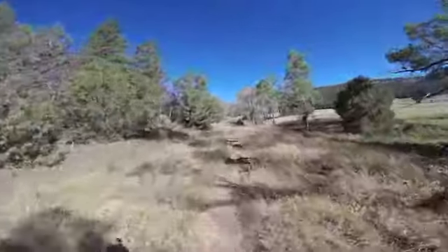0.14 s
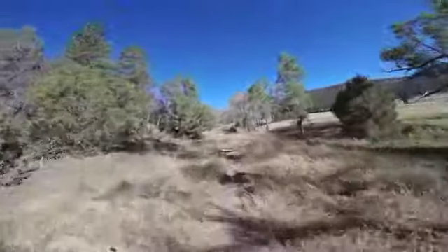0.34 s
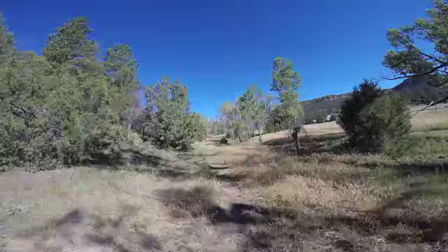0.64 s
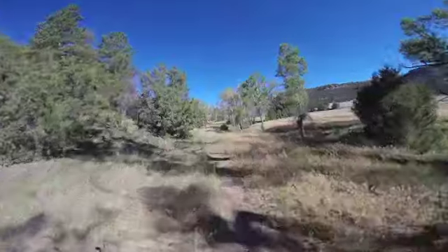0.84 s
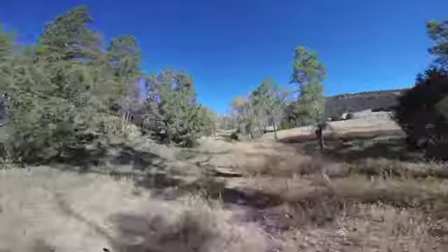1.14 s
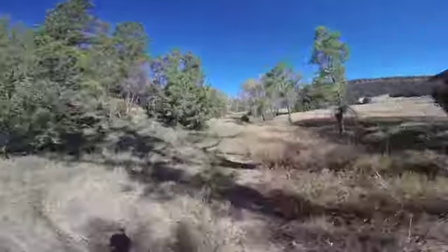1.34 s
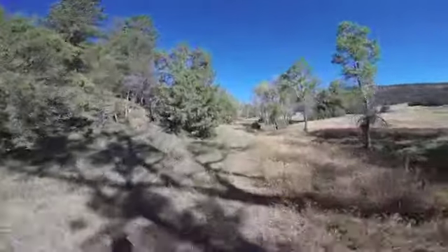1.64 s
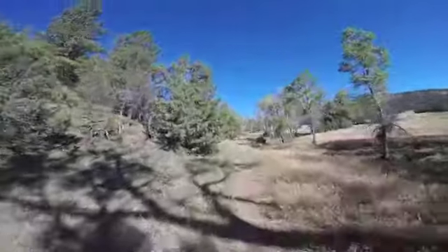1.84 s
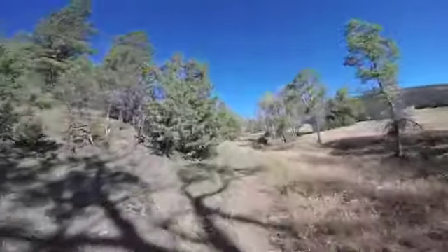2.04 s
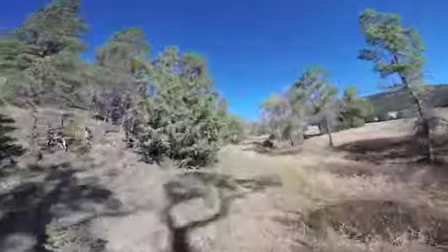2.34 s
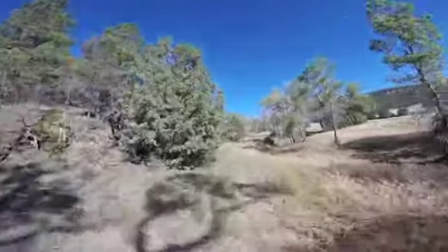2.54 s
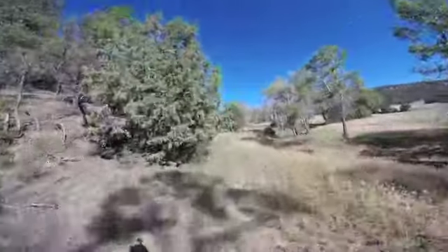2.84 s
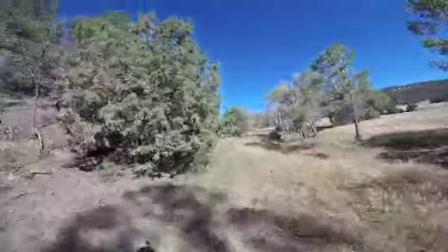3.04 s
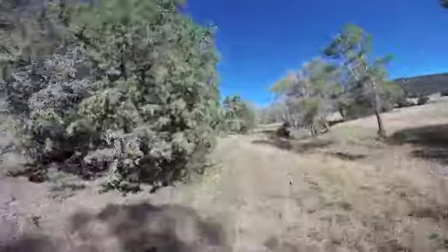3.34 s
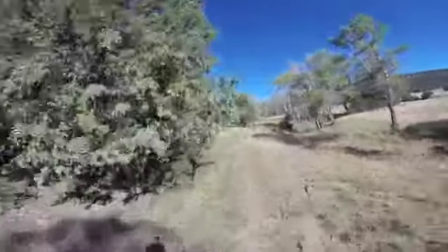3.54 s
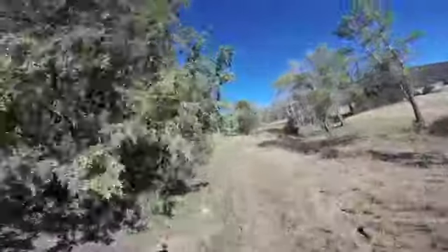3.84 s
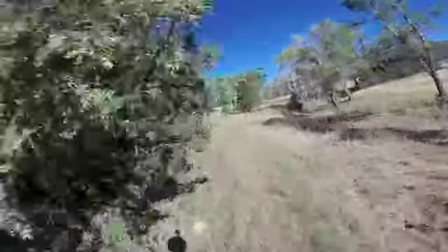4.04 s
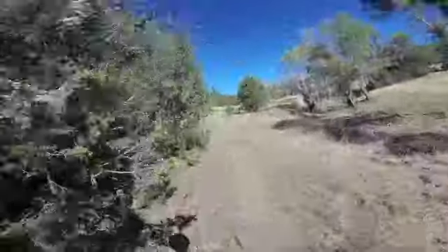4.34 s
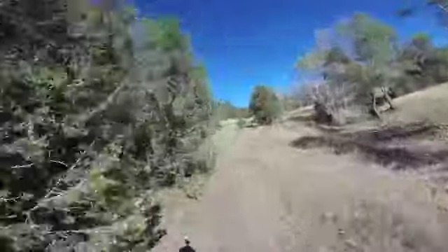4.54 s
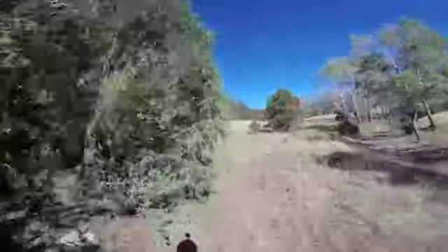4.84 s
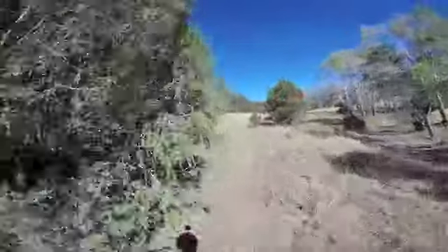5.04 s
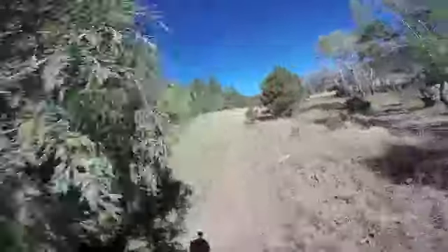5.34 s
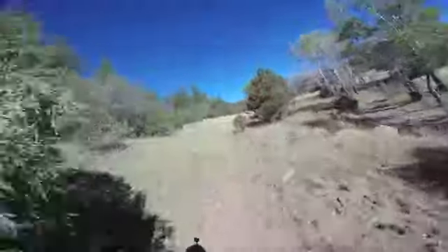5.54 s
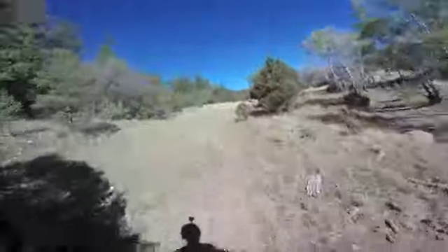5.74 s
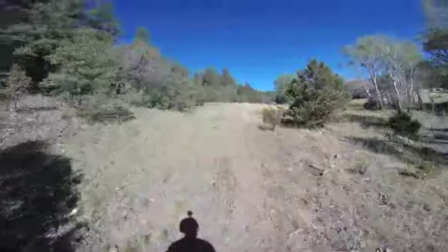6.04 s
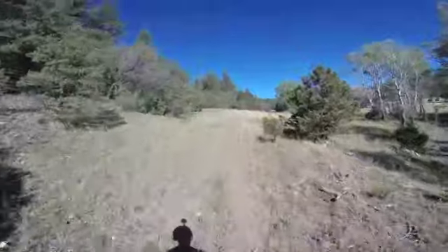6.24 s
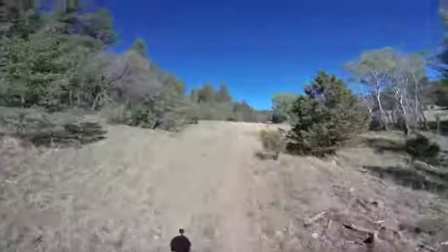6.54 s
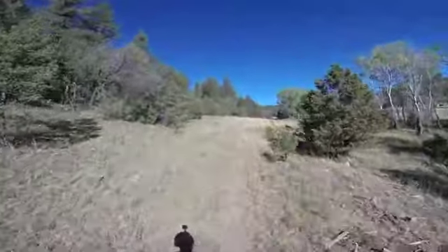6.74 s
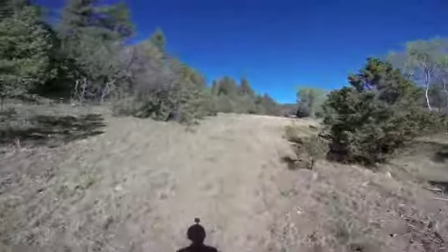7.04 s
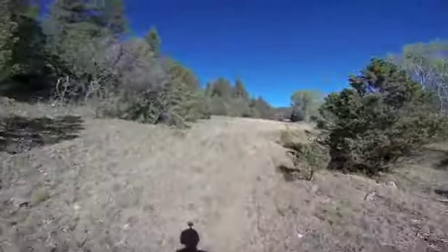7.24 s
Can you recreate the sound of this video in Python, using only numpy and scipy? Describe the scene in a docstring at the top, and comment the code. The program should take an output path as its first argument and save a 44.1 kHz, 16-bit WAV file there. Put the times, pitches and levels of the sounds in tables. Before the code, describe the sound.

Mountain bike on a dirt trail heard from inside a camera case: low rumble, hollow knocks, brake disc tings, and a branch lashing sharply midway.

```python
"""A dirt trail under a mountain bike, heard from inside the hard case of a helmet camera.
Noise and sparse grains make the tyres' grit and drone, over a low shudder near 25 Hz at a wandering rate.
Struck banks of dying modes make the knocks, bumps, brake disc tings and clacks; slips make the disc shimmer.
Noise snaps and ringing make sharp blows on the case: a dull clack, then a branch's lashes.
Faint hiss and whine come from the electronics; the camera's limiter ducks everything under the loudest peaks."""
import sys
import numpy as np
from scipy import signal
from scipy.fft import rfft, irfft
from scipy.io import wavfile
from scipy.ndimage import uniform_filter1d, minimum_filter1d

SR = 44100
rng = np.random.default_rng(int(sys.argv[2]) if len(sys.argv) > 2 else 0)


def generate_wav(signal):
    """Clip the signal to [-1, 1] and save it as 16-bit WAV at the path in sys.argv[1]."""
    frames = np.transpose(np.atleast_2d(signal))
    scaled = np.clip(frames, -1, 1) * 32767
    pcm = np.round(scaled).astype(np.int16)
    wavfile.write(sys.argv[1], SR, pcm)


N = 325453
TIME = np.arange(N) / SR  # seconds
AGE = np.arange(SR // 3) / SR  # seconds since a blow

# The ground under the tyres, as a curve.
# Each row: time in seconds, level of grit in dB, level of rolling drone in dB before its trim.
GROUND = [(0, -60, -52.5), (.75, -60.5, -44.5), (1.35, -60, -51), (2.05, -61.5, -48), (2.55, -60.5, -47.5),
          (3.0, -62, -49), (3.35, -58, -36), (3.75, -58, -42), (4.301, -55, -37), (4.699, -59.5, -45),
          (5.201, -61.5, -43), (5.6, -58.5, -49), (5.95, -52.5, -40.5), (6.3, -57.5, -49),
          (6.748, -61, -57.5), (7.38, -61, -55)]
# How the camera shudders with the roll of the trail, as a curve. Each row: time in seconds, level in dB.
SWAY = [(0, -43), (.45, -29.5), (.8, -20.5), (1.0, -34), (1.4, -35.5), (1.75, -29), (2.2, -31.5),
        (2.45, -25.5), (3.05, -35), (3.35, -29.5), (4.0, -22.5), (4.6, -31), (5.3, -34), (5.9, -26),
        (6.5, -34), (7.38, -35.5)]
# A tyre slides briefly through loose grit. Each row: middle in seconds, length in seconds, level in dB.
SLIDES = [(0.675, 0.057, -49.5), (2.015, 0.14, -54), (3.21, 0.11, -50.5), (3.335, 0.039, -47.5),
          (5.758, 0.04, -43.5), (5.884, 0.042, -44), (6.063, 0.066, -40.5)]
# How the pad rubs the disc, as a curve.
# Each row: time in seconds, level of the shimmer in dB, level of the light grazes in dB before their trims.
BRUSH = [(0, -72, -45.5), (.5, -68, -43), (1.3, -74, -43), (1.8, -70.5, -45), (2.9, -75, -45),
         (3.7, -67.5, -42.5), (4.15, -74, -48), (4.35, -61, -46.5), (4.601, -72.5, -41.5), (5.3, -79, -52),
         (5.41, -60.5, -53.5), (5.5, -70, -48.5), (5.77, -60, -46.5), (6.0, -64, -48), (6.25, -64, -49),
         (6.6, -76.5, -55.5), (7.001, -72.5, -50), (7.38, -73, -42)]

# Soft bumps under the tyres.
# Each row: start in seconds, thud level in dB, level of the grit scuff in dB, both before their trims.
BUMPS = [(0.002, -33, -31), (0.698, -28, -40), (0.772, -29, -38.5), (0.904, -33, -39.5), (1.468, -37, -39),
         (1.694, -25, -36.5), (1.763, -30, -41), (2.067, -31.5, -39), (2.281, -38, -43),
         (2.747, -20, -32.5), (3.186, -21, -34), (3.547, -28, -38), (3.886, -21, -40), (4.11, -15.5, -32),
         (4.226, -25.5, -37), (4.323, -30, -46), (4.45, -21, -31), (4.595, -34, -39.5), (5.711, -40, -40.5),
         (5.863, -22.5, -35.5), (6.013, -30.5, -45), (6.202, -31, -45)]
# The brake disc strikes its pad hard. Each row: start in seconds, level in dB before its trim.
TINGS = [(.508, -36), (.54, -38.5), (.606, -33.5), (.671, -34), (.81, -36), (.869, -41.5), (.93, -37.5),
         (1.075, -38.5), (1.175, -38.5), (1.35, -36), (1.787, -36), (1.988, -37), (2.211, -35.5),
         (2.346, -39), (2.872, -39), (3.027, -34.5), (3.168, -37.5), (3.5, -36), (3.64, -31.5),
         (3.777, -33.5), (4.237, -37), (4.265, -36.5), (4.71, -41), (5.033, -41), (5.219, -40.5),
         (5.26, -42.5), (5.395, -41.5), (5.595, -35), (5.879, -27), (6.04, -28.5), (6.165, -29.5),
         (6.282, -32), (6.343, -32.5), (6.389, -36), (6.461, -41.5)]
# The mount knocks against its stop. Each row: time of the main blow in seconds, its peak in dB.
KNOCKS = [(0.3239, -18), (0.576, -23), (0.7579, -13.5), (1.0048, -27), (1.205, -17), (1.6115, -21),
          (2.1219, -25), (2.3909, -22), (2.5914, -25), (2.8135, -15.5), (2.9953, -23.5), (3.106, -14.5),
          (3.236, -1), (3.377, -8), (3.614, -7), (3.6922, -17), (3.8315, -17), (3.935, -7.5), (4.185, -25),
          (4.5094, -9), (4.659, -15), (4.882, -18.5), (5.1013, -18.5), (5.462, -24.5), (5.7956, -1.5),
          (5.9559, -14.5), (6.116, -3.5), (6.4328, -18), (6.6307, -28), (7.1116, -33.5), (7.3523, -25.5)]
# Hard parts clack together.
# Each row: start in seconds, level in dB, hardness as a cut-off in Hz, ring length as a factor.
CLACKS = [(0.342, -37.5, 2100, 0.9), (1.1375, -47, 13000, 0.23), (1.1379, -39.5, 2300, 0.96),
          (1.8956, -54.5, 9200, 0.98), (2.681, -30, 9900, 0.96), (3.4709, -46.5, 9700, 1)]
# Sharp blows strike the case: a dull clack at 3.25, then a branch's lashes from 4.388.
# Each row: start in seconds, peak in dB, hardness as a cut-off in Hz, ring length as a factor.
SHARP_BLOWS = [(3.2535, -4, 2500, 0.28), (4.388, 18, 13000, 0.64), (4.3911, 10.5, 8940, 0.6),
               (4.4012, 7.5, 12000, 0.57), (4.403, -2, 8070, 0.92)]

# Spectra of the crushed grit, the frame's drone, the electronics' hiss, the hard chatter and the
# sharp blows' snap. Each row: frequency in Hz, relative density in dB per Hz.
GRIT_SPECTRUM = [(350, 9.5), (600, -1), (800, 1.5), (1050, -1), (1420, 1), (1900, -6.5), (2450, -0.5),
                 (3200, -15.5), (4500, -20), (8000, -31), (15000, -39.5)]
DRONE_SPECTRUM = [(45, 5.5), (70, -18), (130, -1), (186, 5.5), (225, -4), (290, -14.5), (385, -9),
                  (520, -24.5), (800, -44.5)]
HISS_SPECTRUM = [(100, 2), (1500, 0), (3500, 3), (4200, -4.5), (6000, -4.5), (8000, -13.5), (11000, -12),
                 (15000, -20)]
CHATTER_SPECTRUM = [(400, -16), (1000, 0), (1500, 5.5), (2100, -4), (2700, -2.5), (3800, -30.5),
                    (5300, -19), (6400, -21), (8200, -40), (9500, -19), (14000, -25)]
SNAP_SPECTRUM = [(300, -13), (950, -5), (1200, -13.5), (1500, 1), (1900, -1), (2300, 7), (3000, -4),
                 (4200, -6), (5000, -11), (5900, -2), (7300, -19), (10000, -16), (15000, -26)]

# Modes of the mount, the case, the lens cover, and the disc's main and upper groups.
# Each row: frequency in Hz, relative level in dB, t60 in seconds at a ring length of 1.
MOUNT_MODES = [(95, -15, .05), (119.5, -9, 0.082), (184.7, 1.5, 0.14), (236.5, -11.5, 0.066),
               (266, -10.5, 0.097), (372.5, 5, 0.043), (455, -26.5, 0.015), (754, -7, 0.071),
               (850, 2.5, 0.039), (1150, -6.5, .03)]
CASE_MODES = [(668, -10, .05), (801, -3.5, 0.03), (1225, -18.5, 0.06), (1380, 1, 0.038),
              (1397, -0.5, 0.052), (1823, -8.5, 0.081), (1950, -21, 0.048), (2380, -6.5, 0.05),
              (2574, 6, 0.017), (2734, -14, 0.069), (4700, -27.5, .03), (5440, -9.5, 0.019),
              (6140, -15, 0.022), (6820, -17.5, 0.034), (9500, -23, .014), (12450, -22.5, 0.015)]
COVER_MODES = [(1560, -11.5, .025), (1800, -15.5, 0.055), (2274, -2, 0.039), (2269, -7.5, .02),
               (2760, -15, 0.036), (3510, -16, 0.063), (4360, -31, .06), (5810, -13.5, 0.022),
               (5710, 4, 0.011), (8300, -21, 0.013), (10600, -21.5, 0.022)]
DISC_MODES = [(2231, -2.5, 0.14), (2166, 6.5, 0.091), (2179, -1.5, 0.17), (2440, -18, 0.11)]
DISC_UPPER_MODES = [(3583, -3, 0.071), (4770, -19, 0.093), (5500, -18.5, 0.13), (6220, 1, 0.037),
                    (6430, -5.5, 0.039), (7400, -13, 0.08), (8030, -16, 0.1), (12300, -25.5, .08)]
# Faint whine of the camera's electronics. Each row: frequency in Hz, level in dB.
WHINE = [(5846, -77.5), (5873, -92), (8780, -83), (11687, -88), (11719, -77.5), (14626, -95)]


def gain_of(db):
    """Decibels to amplitude."""
    return 10 ** (np.asarray(db) / 20)


def evened(x):
    """Scales to rms 1."""
    return x / np.sqrt(np.mean(x ** 2) + 1e-20)


def peaked(x):
    """Scales to peak 1."""
    return x / (abs(x).max() + 1e-20)


def db_at(rows, times, order):
    """One dB column of a curve at the given times, with straight lines between rows."""
    columns = np.transpose(rows)
    return np.interp(times, columns[0], columns[order])


def level(rows, order):
    """Gain over time from one dB column of a curve."""
    return gain_of(db_at(rows, TIME, order))


def colour(x, points):
    """Shapes x by a spectrum of (Hz, dB) points, with steep ends, at rms 1."""
    hz = np.fft.rfftfreq(len(x), 1 / SR) + 1  # the 1 keeps the logarithm finite
    f, db = np.transpose(points)
    low_end = 1 / (1 + (f[0] / hz / 2) ** 4)
    high_end = 1 / (1 + (hz / f[-1] / 2) ** 4)
    shape = gain_of(np.interp(np.log(hz), np.log(f), db))
    return evened(irfft(rfft(x) * low_end * high_end * shape, len(x)))


def soften(x, hz):
    """Low-pass: a softer contact has less treble."""
    return signal.sosfilt(signal.butter(2, min(hz, SR / 2 - 100), fs=SR, output="sos"), x)


def swell(rise_s, fall_s=np.inf):
    """The envelope of a blow: it builds, then dies away if a fall is given."""
    return (1 - np.exp(-AGE / rise_s)) * np.exp(-AGE / fall_s)


def add(mix, s, sound):
    """Places a sound at s seconds."""
    part = mix[max(round(s * SR), 0):][:len(sound)]
    part += sound[:len(part)]


def ring(modes, length=1, detune=0, scatter=0):
    """Dying modes after one blow; scatter loosens their phases, as the point of contact wanders."""
    hz, db, t60 = np.transpose(modes)[:, :, None]
    hz = hz * (1 + detune * rng.standard_normal(hz.shape))
    turns = hz * AGE + scatter * rng.random(hz.shape)
    decay = gain_of(db - 60 * AGE / (t60 * length))
    return (decay * np.cos(2 * np.pi * turns)).sum(0)


def contact(x, width_s):
    """Smears a blow over the bell-shaped time of a cushioned contact; also gives the bell's delay in s."""
    half = 256  # samples
    bell = np.exp(-.5 * (np.arange(-half, half + 1) / SR / width_s) ** 2)
    return signal.fftconvolve(x, bell / bell.sum()), half / SR


def burst(spectrum, rise_s, fall_s):
    """A puff of coloured noise."""
    return colour(rng.standard_normal(len(AGE)), spectrum) * swell(rise_s, fall_s)


def chance_times(per_s):
    """Irregular moments at a mean rate, each with a strength from -1 to 1."""
    count = round(per_s * N / SR)
    jitter, strength = rng.random((count, 2)).T
    return (np.arange(count) + 2 * jitter) / per_s, 2 * strength - 1


def shaking(knock_db=-14, bump_db=1, clack_db=-16, give=0.9):
    """How hard the bike shakes: blows add their energy, and the suspension softens the largest."""
    power = np.zeros(N)
    shape = swell(rise_s=0.006, fall_s=0.083)
    for blows, weight_db in (KNOCKS, knock_db), (BUMPS, bump_db), (CLACKS, clack_db):
        for s, db, *_ in blows:
            add(power, s, (gain_of(give * db + weight_db) * shape) ** 2)
    return np.sqrt(power)


def sliding():
    """Each slide through loose grit swells and fades like a bell."""
    return sum(gain_of(db) * np.exp(-(2 * (TIME - s) / length) ** 2) for s, length, db in SLIDES)


def shudder(shake, hz=24.6, wander=0.26, buffet_db=-6, shaken_db=3.0):
    """The camera shudders on its mount at a wandering rate, harder as the bike shakes, with wind buffeting."""
    drift = evened(soften(rng.standard_normal(N), 5.3))
    turns = np.cumsum(hz * (1 + wander * drift)) / SR
    tremble = np.sqrt(2) * np.sin(2 * np.pi * turns)
    # each point: Hz, dB per Hz
    buffet = colour(rng.standard_normal(N),
                    [(18, 2), (28, -7.5), (40, -5), (55, -13.5), (90, -23), (200, -70.5)])
    strength = np.hypot(level(SWAY, order=1), gain_of(shaken_db) * shake)
    return strength * evened(tremble + gain_of(buffet_db) * buffet)


def tyres(shake, drone_db=-4, shaken_grit_db=-39, shaken_drone_db=-25,
          grains_per_s=420, grain_db=4.5, smooth=0.22):
    """Crushed grit as many small grains over the drone the frame carries up; both grow with shaking."""
    sizes = gain_of(grain_db * np.minimum(rng.exponential(1, N), 4)) * rng.choice([-1, 1], N)
    grains = sizes * (rng.random(N) < grains_per_s / SR)
    grains = grains + smooth * rng.standard_normal(N)
    rolling_grit = np.hypot(level(GROUND, order=1), sliding())
    grit = np.hypot(rolling_grit, gain_of(shaken_grit_db) * shake)
    drone = gain_of(drone_db) * np.hypot(level(GROUND, order=2), gain_of(shaken_drone_db) * shake)
    return grit * colour(grains, GRIT_SPECTRUM) + drone * colour(rng.standard_normal(N), DRONE_SPECTRUM)


def electronics(hiss_db=-63):
    """Steady coloured hiss and a thin whine of fixed sines."""
    whine = np.zeros(N)
    for hz, db in WHINE:
        whine += np.sqrt(2) * gain_of(db) * np.sin(2 * np.pi * (hz * TIME + rng.random()))
    return whine + gain_of(hiss_db) * colour(rng.standard_normal(N), HISS_SPECTRUM)


def shimmer(sliding_db=-16, catches_per_s=110):
    """The pad catches in tiny slips, harder when the tyre slides; each upper disc mode flutters alone."""
    singing = np.zeros(N)
    for mode in DISC_UPPER_MODES:
        slips = (rng.random(N) < catches_per_s / SR) * rng.standard_normal(N)
        singing += signal.oaconvolve(slips, ring([mode]) * swell(0.0028))[:N]
    strength = np.hypot(level(BRUSH, order=1), gain_of(sliding_db) * sliding())
    return strength * evened(singing)


def bumps(thud_db=5, scuff_db=1, stones_per_s=6, stone_thud_db=12.5, stone_scuff_db=10.5, spread_db=3):
    """A slow push rings mostly the lowest modes of the mount, while the tyre scuffs through grit."""
    out = np.zeros(N)
    # small stones come at random, as strong as the ground is rough
    times, strength = chance_times(stones_per_s)
    stone_thuds = db_at(GROUND, times, order=2) + stone_thud_db + spread_db * strength
    stone_scuffs = db_at(GROUND, times, order=1) + stone_scuff_db + spread_db * strength
    for s, db, grit_db in list(BUMPS) + list(zip(times, stone_thuds, stone_scuffs)):
        thud, early = contact(ring(MOUNT_MODES, length=0.67, detune=0.06), 0.0012)
        add(out, s - early + .004, gain_of(db + thud_db) * peaked(thud))
        add(out, s, gain_of(grit_db + scuff_db) * burst(GRIT_SPECTRUM, 0.0066, 0.013))
    return out


def disc(main_db=5, rise_s=0.0025, grazes_per_s=38, graze_db=-2.0, spread_db=5):
    """The brake disc tings as the wheel flexes; lighter grazes keep it chirping in between."""
    out = np.zeros(N)
    times, strength = chance_times(grazes_per_s)
    grazes = zip(times, db_at(BRUSH, times, order=2) + graze_db + spread_db * strength)
    for s, db in list(TINGS) + list(grazes):
        ting = peaked(ring(DISC_MODES, detune=0.0043, scatter=0.25)) * swell(rise_s)
        add(out, s, gain_of(db + main_db) * ting)
    return out


def knocks(touch=0.36, lead_s=0.002843, dip_s=0.001352, case_db=-24, crunch=1.72):
    """A light first touch, a rebound, then the main blow; the mount booms and the case buzzes a little."""
    out = np.zeros(N)
    stiff_modes = [mode for mode in MOUNT_MODES if mode[0] > 600]
    for s, db in KNOCKS:
        size = gain_of(db)
        boom, early = contact(ring(MOUNT_MODES, detune=.012), .00042)
        add(out, s - early, size * peaked(boom))
        # the quick first touch reaches only the stiffer modes, and grows faster than the blow
        tap, _ = contact(ring(stiff_modes, length=.45, detune=.04), .00022)
        add(out, s - early - lead_s, touch * size ** 2 * peaked(tap))
        rebound, _ = contact(ring(MOUNT_MODES, length=0.045), 0.00068)
        add(out, s - early - dip_s, -size * .5 * peaked(rebound))
        buzz = peaked(ring(CASE_MODES, detune=0.026, scatter=1))
        buzz = buzz + crunch * peaked(burst(GRIT_SPECTRUM, 0.00029, 0.012))
        add(out, s - .0045, size * gain_of(case_db) * soften(buzz, 2600))
    return out


def clacks(crunch=0.61, boom_db=14):
    """A few milliseconds of hard chatter ring the case and nudge the mount."""
    out = np.zeros(N)
    for s, db, hard_hz, length in CLACKS:
        modes = evened(ring(CASE_MODES, length, detune=0.0036, scatter=0.28) * swell(0.0011))
        chatter = evened(burst(CHATTER_SPECTRUM, 0.00067, 0.0017))
        add(out, s, gain_of(db) * evened(soften(modes + crunch * chatter, hard_hz)))
        add(out, s, gain_of(db + boom_db) * peaked(soften(ring(MOUNT_MODES), 190)))
    return out


def sharp_blows(ring_db=-6, boom_db=-17):
    """Each blow is a wide snap that rings the lens cover and shoves the mount; duller blows lose treble."""
    out = np.zeros(N)
    for s, db, hard_hz, length in SHARP_BLOWS:
        modes = peaked(ring(COVER_MODES, length, detune=0.0088, scatter=0.56) * swell(0.00069))
        snap = peaked(burst(SNAP_SPECTRUM, 0.002, 0.0014)) + gain_of(ring_db) * modes
        snap = np.tanh(2 * peaked(snap))  # the hardest peaks flatten
        snap = soften(soften(snap, hard_hz), hard_hz)
        add(out, s, gain_of(db) * peaked(snap))
        shove = soften(ring(MOUNT_MODES, length=0.41), 600)
        add(out, s, gain_of(db + boom_db) * peaked(shove))
    return out


def scene():
    """All layers sum at the one microphone in the case."""
    shake = shaking()
    ground = shudder(shake) + tyres(shake) + bumps()
    brake = shimmer() + disc()
    blows = knocks() + clacks() + sharp_blows()
    return (ground + electronics() + brake + blows)[None]


def record(dry, recovery_db_per_s=20, edge_hz=15150):
    """A look-ahead limiter ducks ahead of peaks and recovers slowly; then a low-pass limits the band."""
    over_db = np.maximum(20 * np.log10(abs(dry[0]) + 1e-9), 0)
    ahead_db = -minimum_filter1d(-over_db, 1601)  # widest excess within 800 samples either side
    fall = recovery_db_per_s * TIME
    held_db = np.maximum.accumulate(ahead_db + fall) - fall
    duck_db = uniform_filter1d(held_db, size=64)
    low_pass = signal.firwin(511, edge_hz, window=("kaiser", 9), fs=SR)
    return signal.oaconvolve(dry * gain_of(-duck_db), low_pass[None], "same")


dry = scene()
out = record(dry)
generate_wav(out)
```